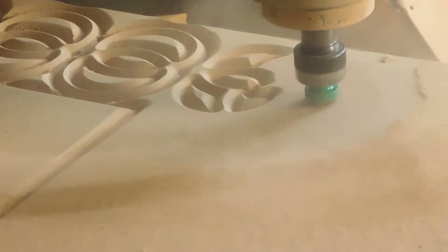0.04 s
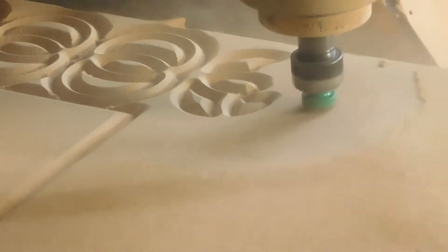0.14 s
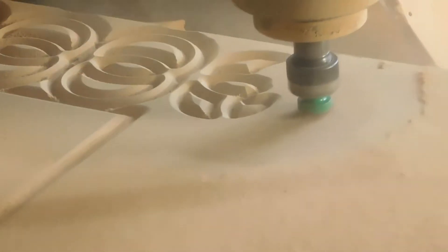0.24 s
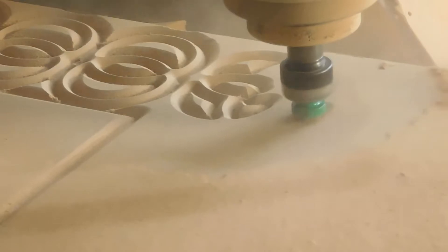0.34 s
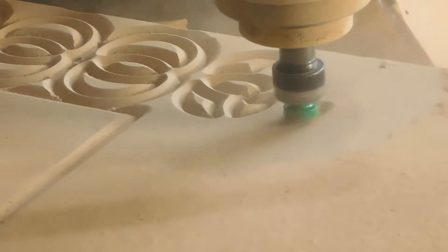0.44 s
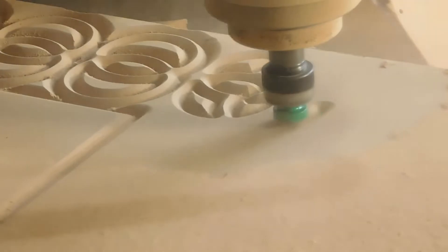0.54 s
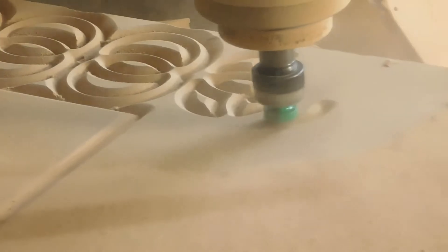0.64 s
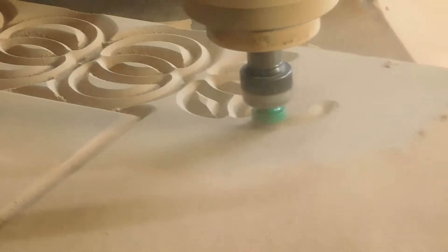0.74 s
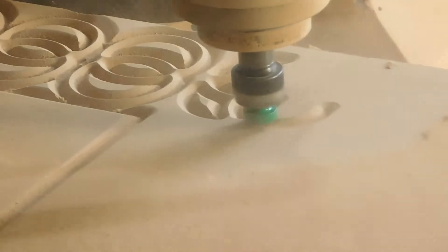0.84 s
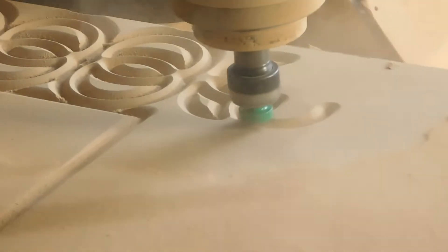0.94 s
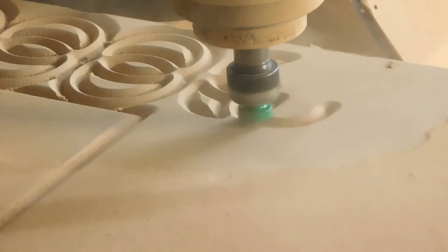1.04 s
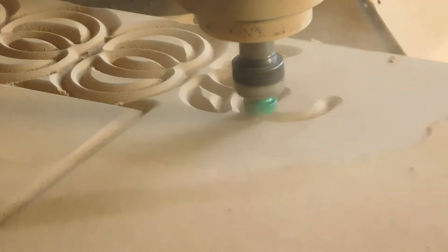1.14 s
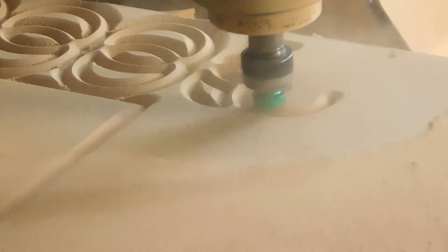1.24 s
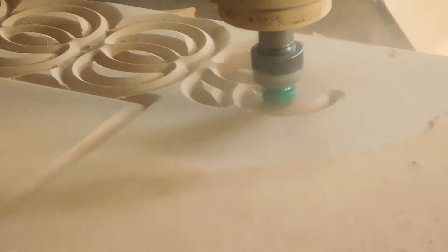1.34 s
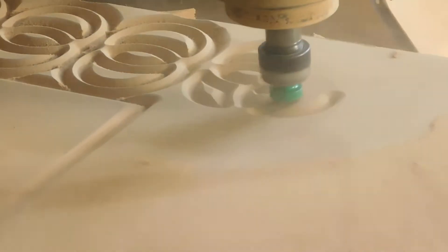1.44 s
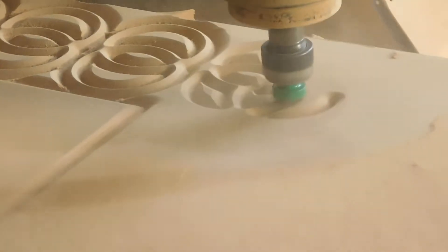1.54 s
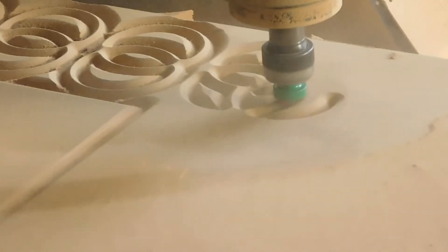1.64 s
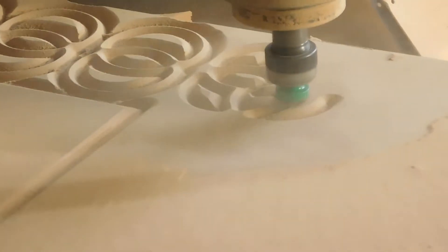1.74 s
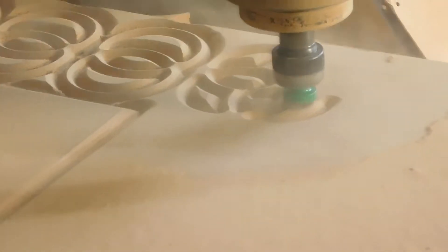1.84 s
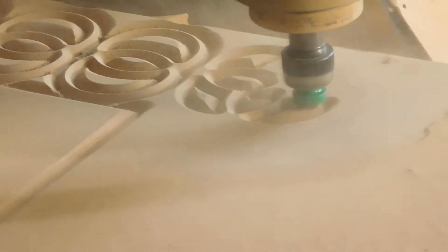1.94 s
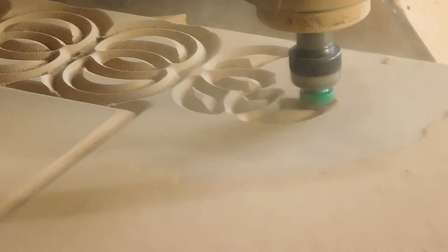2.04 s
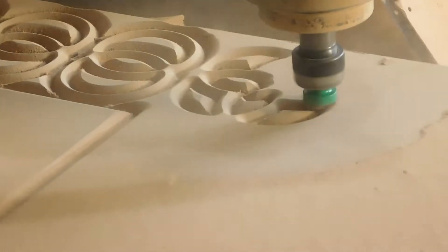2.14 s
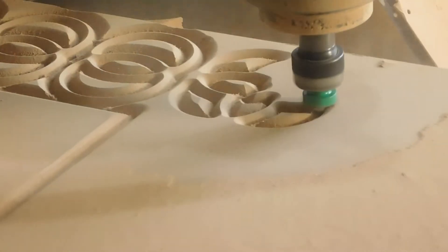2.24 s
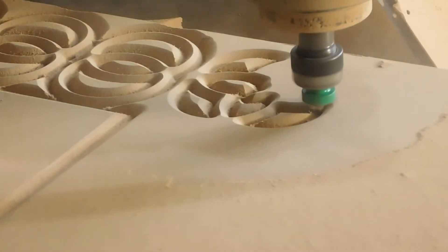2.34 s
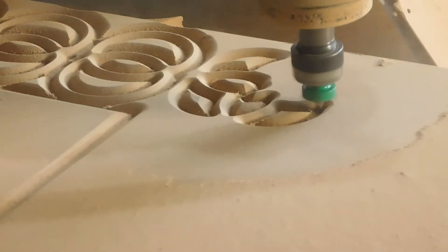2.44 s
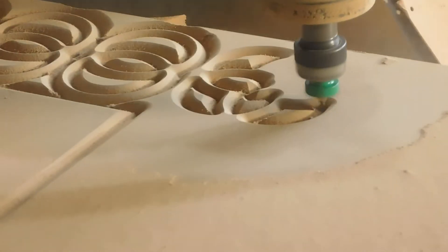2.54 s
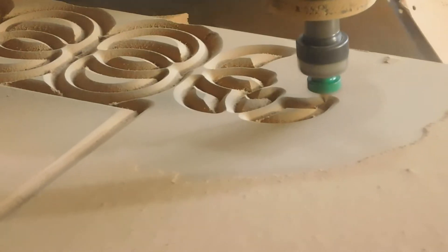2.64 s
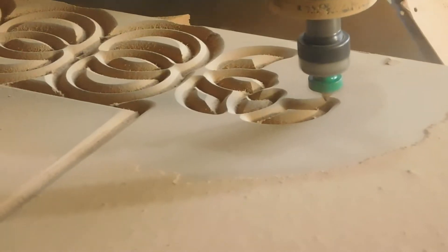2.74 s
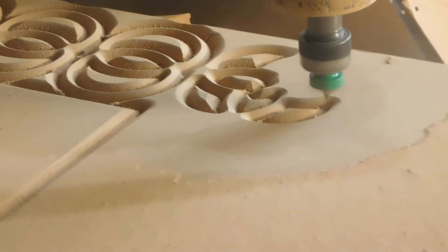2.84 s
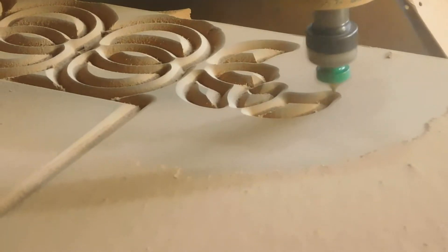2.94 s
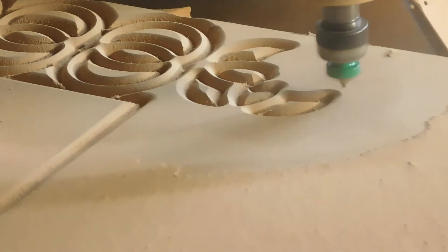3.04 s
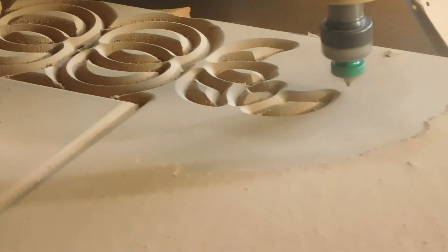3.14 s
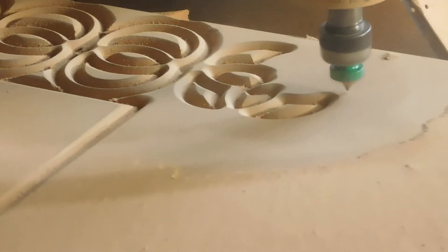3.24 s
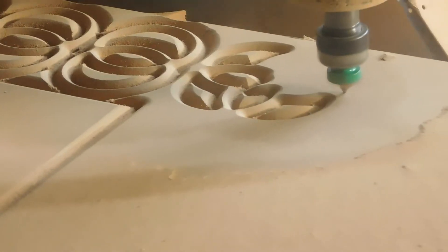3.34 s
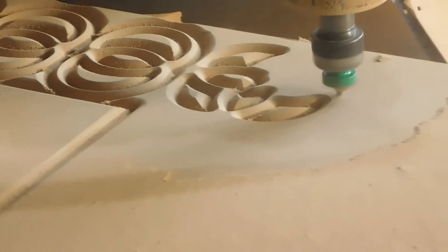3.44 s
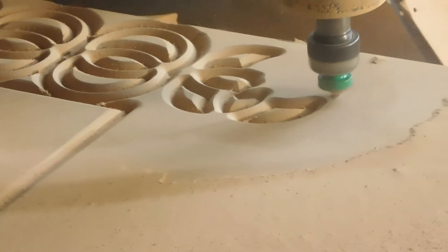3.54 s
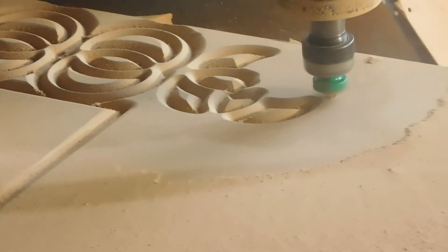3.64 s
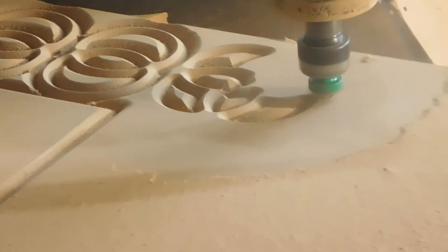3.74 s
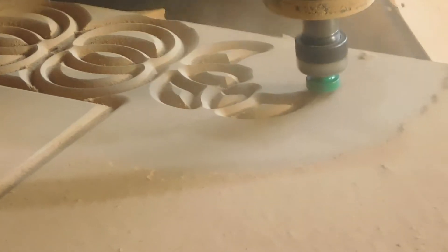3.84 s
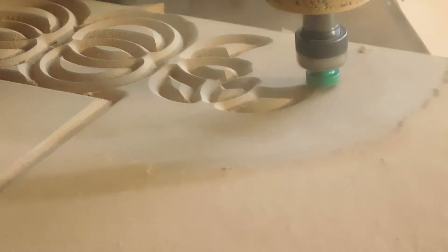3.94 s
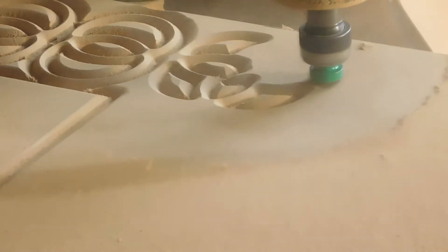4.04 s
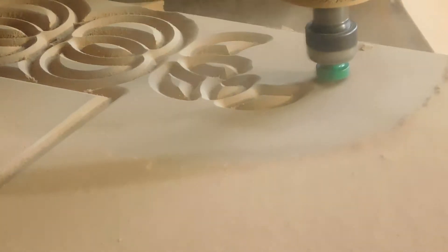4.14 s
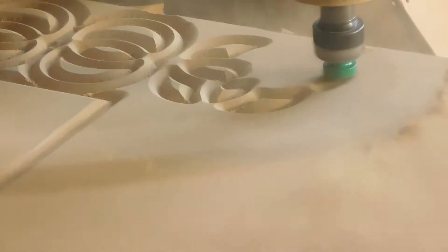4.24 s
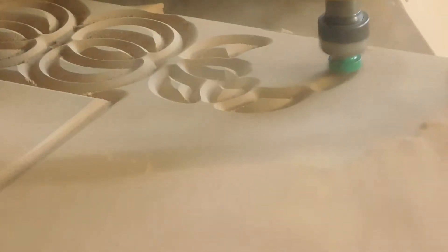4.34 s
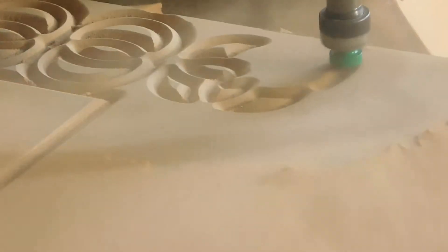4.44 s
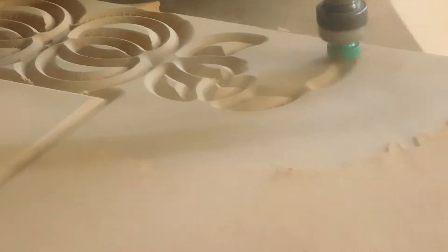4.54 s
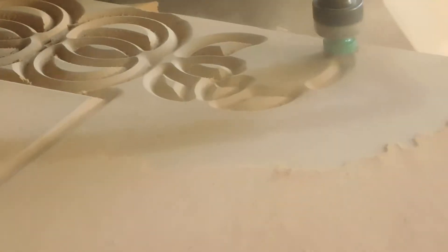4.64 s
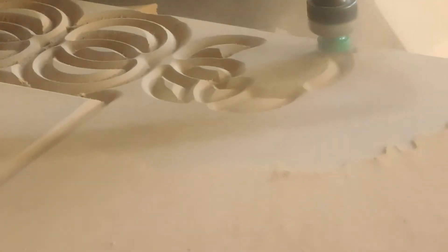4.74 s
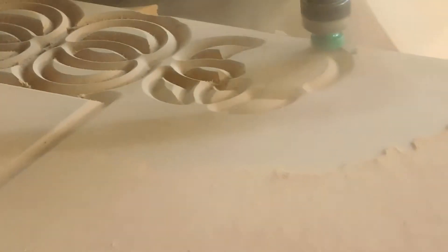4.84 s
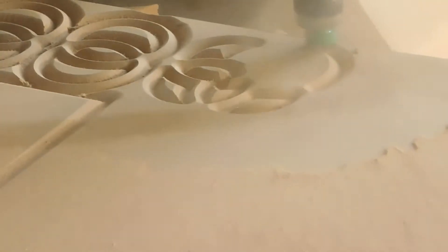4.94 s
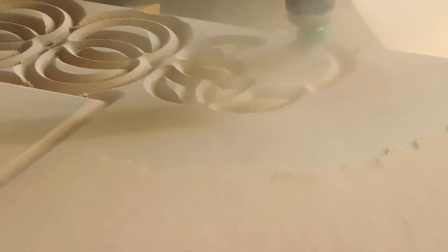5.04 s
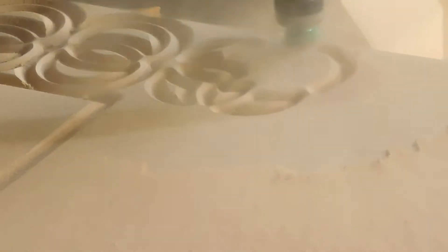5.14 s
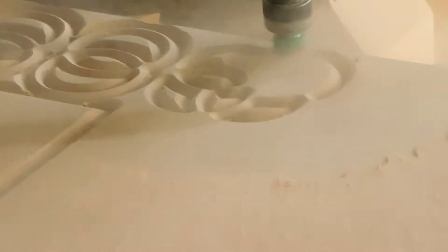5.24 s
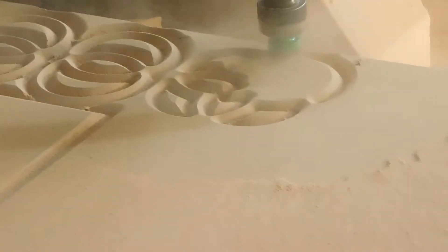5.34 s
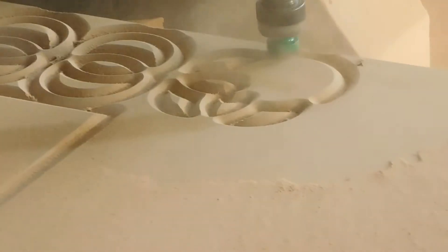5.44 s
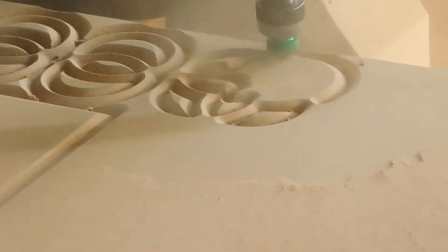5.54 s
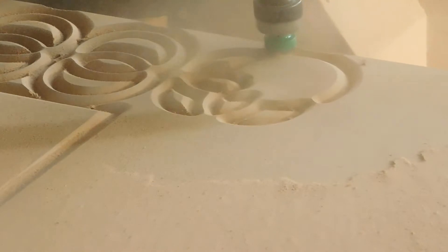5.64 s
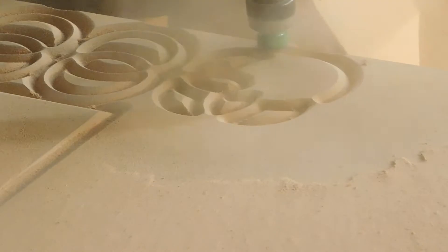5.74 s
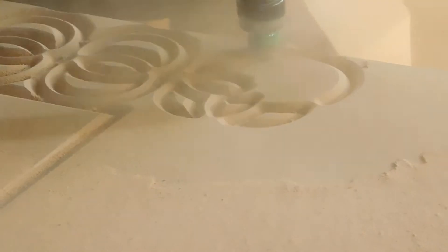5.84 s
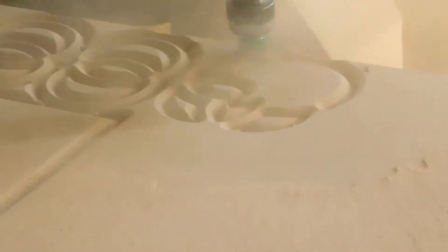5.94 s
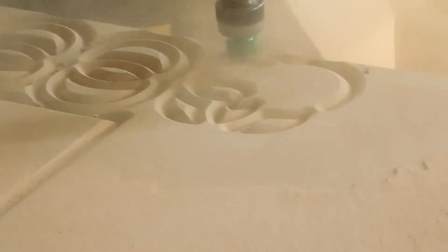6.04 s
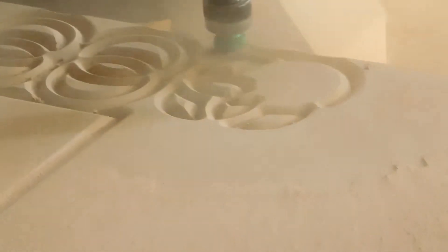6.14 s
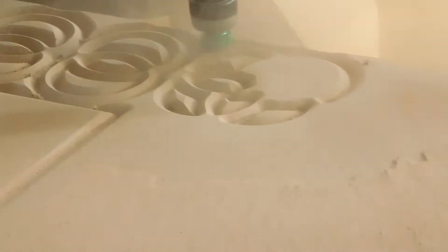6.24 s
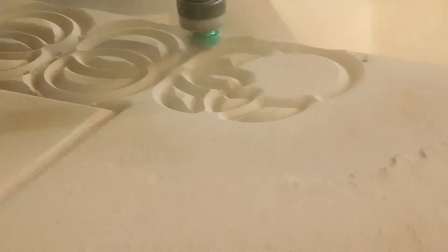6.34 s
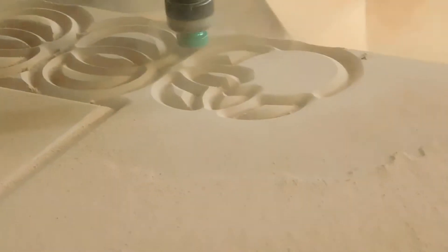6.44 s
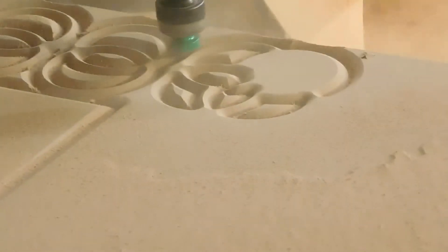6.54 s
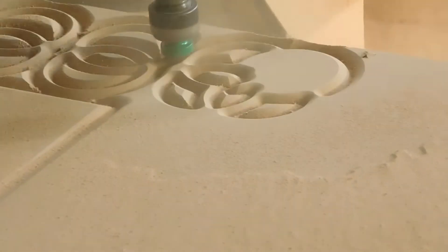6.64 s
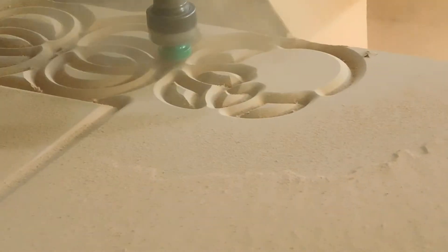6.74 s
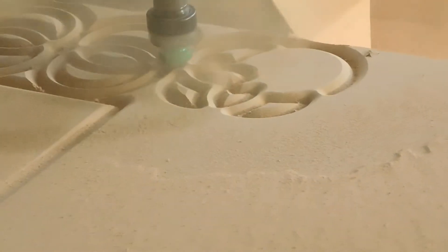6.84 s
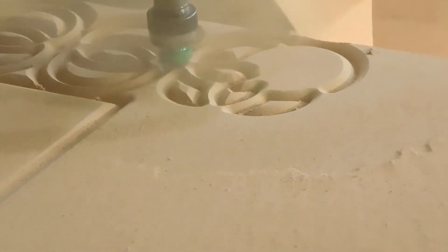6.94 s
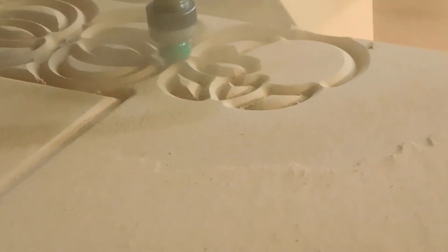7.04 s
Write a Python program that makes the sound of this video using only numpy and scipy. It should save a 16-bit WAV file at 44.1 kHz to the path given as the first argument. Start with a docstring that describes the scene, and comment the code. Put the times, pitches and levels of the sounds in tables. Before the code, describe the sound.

A router bit cuts into a wooden board right from the start, with a loud, high whine that wavers and sags slightly in pitch under load. Squeals, a buzzing chatter and a gritty rush of chips ride on it. The whine drops out briefly just after 1 second, then resumes. From about 2 seconds it falls back, and between roughly 2.4 and 3.5 seconds the bit only grazes the wood, leaving a faint tone, a hiss of cooling air and a thin, very high whistle. The bit works back in and is loud again from 4 seconds, squealing and rasping, with short dips around 6.5 and 7 seconds and a last strong peak at the end. A low rumble and machine hum run underneath. The tone swings between left and right in the workshop and slightly overloads the microphone.

```python
"""A loud, wavering whine with squeals and a gritty rasp: a router carves curved grooves in a wooden board.
The two-flute bit sings at twice the shaft speed, sags in pitch under load, chatters in the groove
and throws chips. For about a second it lifts, only grazing the wood, then it digs back in.
Behind it are a low rumble, a hiss of cooling air, the machine's hum and the whistle of a drive.
The loud tone overloads the microphone a little."""
import sys
import numpy as np
from scipy import signal
from scipy.fft import rfft, irfft, next_fast_len
from scipy.io import wavfile
from scipy.ndimage import uniform_filter1d, map_coordinates

SR = 44100
rng = np.random.default_rng(int(sys.argv[2]) if len(sys.argv) > 2 else 0)


def dump_mix(stems):
    """Bounce the given channels to the path in sys.argv[1] as a 16-bit WAV at rate SR."""
    frames = np.atleast_2d(stems).T  # one column per channel
    limited = np.clip(frames, -1, 1)  # hard clip at full scale
    pcm = np.round(limited * 32767).astype(np.int16)
    wavfile.write(sys.argv[1], SR, pcm)


N = 313110

# The band in which each noise has its level set. Each entry: low edge in Hz, high edge in Hz.
LEVEL_BANDS = {"chips": (850, 1130), "air": (8000, 12000), "rumble": (20, 90), "rasp": (4430, 4620)}


def flute_whine(shaft_angle):
    """Two flutes strike the wood each turn: a whine that swells with every pass."""
    # Passes through the wood, faint when grazing. Each row: start and end in seconds, then their dB.
    passes = [(0.093, 1.098, -4.5, -7), (1.13, 1.26, -23, -19), (1.29, 2.014, -6, -6.5),
              (2.05, 2.526, -17, -22.5), (2.237, 2.25, -10, -14), (2.74, 3.218, -24, -23),
              (3.464, 3.938, -22, -15.5), (3.62, 3.62, -13, -14), (3.982, 5.351, -4.5, -11),
              (5.447, 6.585, -9, -6), (6.696, 7.2, -9, 0)]
    # Brief dips in the whine. Each row: centre in seconds, depth in dB, half width in seconds.
    dips = [(0.56, 3.5, 0.19), (0.94, 4.5, 0.1), (1.54, 3, .06), (1.76, 4, 0.11), (2.16, 4, 0.043),
            (2.3, 11, 0.021), (2.36, 9, 0.023), (2.459, 15, 0.047), (3.57, 3.5, 0.066), (3.68, 20, .03),
            (3.82, 7, 0.026), (3.94, 5, 0.038), (4.07, 4, 0.075), (4.34, 5, 0.037), (5.05, 3.5, 0.16),
            (5.6, 2.5, 0.055), (5.85, 1, 0.24), (6.09, 4.5, 0.1), (6.425, 8, 0.047), (6.531, 9.5, 0.059),
            (7.03, 10.5, 0.15)]
    # The whine swings from side to side. Each row: time in seconds, left minus right in dB.
    swing = [(0.0, 0), (0.32, 4), (0.55, -5.5), (0.85, -3), (1.01, 5.5), (2.1, -1), (2.18, 5), (3.3, -2),
             (3.83, 3.5), (5.32, -2.5), (5.44, 0.5), (6.37, -2), (6.66, 4.5), (6.94, -1), (7.1, 2.5)]
    enter_s, leave_s, free_spin_db = 0.056, 0.055, -30.5
    pass_db = [curves([(start - enter_s, free_spin_db), (start, start_db),
                       (end, end_db), (end + leave_s, free_spin_db)])[0]
               for start, end, start_db, end_db in passes]
    dip_db = sum(db * bump(s, half_s) for s, db, half_s in dips)
    whine = amp(np.max(pass_db, axis=0) - dip_db) * np.exp(2j * shaft_angle)
    return in_room(whine, curves(swing)[0], drift_db=0.6, drift_rad=0.23, rate=5)


def shaft_tone(shaft_angle):
    """One cycle for each turn of the shaft, an octave under the whine."""
    # Each row: time in seconds, level in dB.
    levels = [(0.0, -19), (0.15, -28.5), (0.6, -24.5), (1.14, -35.5), (1.25, -30), (1.4, -36),
              (1.95, -39.5), (2.1, -30.5), (3.3, -31), (3.5, -22.5), (3.9, -22.5), (4.05, -29.5),
              (5.3, -34.5), (5.9, -49), (6.37, -23), (6.7, -34.5), (7.05, -21.5), (7.1, -19)]
    tone = amp(curves(levels)[0] + 0.97 * wobble(13)) * np.exp(1j * shaft_angle)
    return in_room(tone, 0.28, drift_db=2.0, drift_rad=0.047, rate=9.1)


def overtones(shaft_angle, cutting, flare_db, grain_db):
    """The cut buzzes at multiples (orders) of the shaft speed, softer while the bit lifts."""
    # The body of the buzz. Each row: order, level in dB while cutting.
    strong_orders = [(3, -32.5), (4, -27.5), (6, -29.5), (7, -36.5), (8, -30.5), (10, -32.5)]
    # Its fine edge. Each row: order, level in dB relative to weak_db.
    weak_orders = [(5, -7), (9, -12), (11, -8), (12, -10.5), (13, -14), (14, -19.5), (15, -29), (16, -15.5),
                   (17, -23), (18, -16), (19, -37), (20, -22.5), (21, -27), (22, -22), (24, -32), (26, -29)]
    top_orders = [(k, -26.5 - 0.3 * (k - 23)) for k in range(23, 37) if k not in dict(weak_orders)]
    lift_db = -16 * (1 - cutting)
    weak_db = -28 + lift_db + flare_db
    out = np.zeros((2, N))
    for order, db in strong_orders:
        level = amp(db + lift_db + 0.81 * flare_db) + squeals(order)
        tone = level * amp(1.57 * wobble(14)) * np.exp(1j * order * shaft_angle)
        out += in_room(tone, 0.2, drift_db=0.6, drift_rad=0.17 * order, rate=9.9)
    for order, db in weak_orders + top_orders:
        level = amp(weak_db + db) + squeals(order)
        swell_db = grain_db + 3.4 * wobble(19)  # the grain reshapes each cut
        tone = level * amp(swell_db) * np.exp(1j * order * shaft_angle)
        out += in_room(tone, 1.7, drift_db=2.3, drift_rad=1.0, rate=6.1)
    return out


def squeals(order):
    """Envelope of one overtone's squeals: each rises, holds and falls away."""
    # Each row: centre in seconds, half width in seconds, shaft order, level in dB.
    events = [(0.24, 0.18, 6, -18), (0.3, 0.39, 3, -35), (0.4, .2, 5, -41), (0.52, 0.17, 9, -33),
              (1.17, 0.16, 12, -33), (1.18, 0.08, 8, -32), (1.75, 0.19, 12, -33), (2.02, 0.083, 7, -29),
              (2.3, 0.17, 4, -35), (2.3, 0.11, 6, -29), (3.45, .1, 6, -35), (3.6, 0.21, 4, -33.5),
              (3.9, 0.067, 4, -27), (0.62, 0.54, 10, -36), (0.75, 0.64, 4, -22.5), (1.0, 0.11, 3, -31),
              (0.97, 0.11, 10, -28.5), (1.17, 0.13, 10, -25), (1.85, .25, 4, -23), (2.07, .13, 6, -19),
              (2.09, 0.11, 8, -20), (2.08, 0.14, 3, -35), (3.91, 0.057, 6, -30), (3.91, 0.037, 8, -30),
              (4.14, 0.16, 7, -29), (4.25, .15, 8, -28.5), (4.3, 0.18, 6, -24.5), (4.33, 0.14, 3, -30),
              (4.55, .3, 4, -28), (4.97, 0.32, 7, -24), (4.97, .25, 8, -25.5), (4.92, 0.1, 10, -30),
              (5.12, 0.17, 6, -21), (5.12, 0.12, 4, -29), (5.3, 0.092, 10, -31), (5.45, 0.23, 8, -29),
              (5.9, 0.63, 12, -36), (6.03, 0.23, 6, -21.5), (6.05, 0.14, 18, -36.5), (6.5, 0.16, 10, -31),
              (6.55, .1, 4, -25.5), (6.57, 0.09, 6, -25), (6.76, 0.056, 8, -29), (6.738, 0.075, 4, -15.5),
              (6.75, 0.14, 3, -27), (6.97, 0.17, 3, -23), (6.95, 0.16, 7, -29), (6.96, 0.16, 6, -31),
              (7.1, 0.068, 4, -17)]
    return sum(amp(db) * np.minimum(1.8 * bump(s, half_s), 1)
               for s, half_s, k, db in events if k == order)


def motor_tones(shaft_angle):
    """The motor's own faint tones, which carry on in or out of the wood."""
    # Each row: shaft order, level in dB.
    orders = [(16, -51), (17, -47)]
    return sum(in_room(amp(db) * np.exp(1j * order * shaft_angle), 0, drift_db=2, drift_rad=0.8, rate=5)
               for order, db in orders)


def chatter(shaft_angle, cutting):
    """The bit shakes in the groove: rough bands of noise, mostly just below the shaft orders."""
    # Each row: shaft order, level in dB relative to chatter_db.
    orders = [(2, -5), (3, -18.5), (4, -6), (5, -27), (6, -12), (7, -18), (8, -16.5), (9, -21), (10, -17),
              (11, -21), (12, -19), (14, -25)]
    chatter_db = depth_level("chatter") - 4 * (1 - cutting)
    out = np.zeros((2, N))
    for order, db in orders:
        shake = flutter(centre_hz=-46, half_width_hz=22) + 0.45 * flutter(centre_hz=5, half_width_hz=70)
        rough_tone = amp(chatter_db + db) * shake * np.exp(1j * order * shaft_angle)
        out += in_room(rough_tone, 0, drift_db=1.5, drift_rad=0.72, rate=10)
    return out


def chips_and_fibres(shaft_angle, flare_db, grain_db):
    """Chips rush in the mids and tearing fibres rasp above, both pulsed by the turning flutes."""
    # Colour of the chips. Each row: frequency in Hz, relative density in dB.
    chip_spectrum = [(150, -29), (600, -21.5), (1000, -16.5), (1600, -18.5), (2500, -26.5), (4000, -68)]
    # Loudness of the chips. Each row: time in seconds, in-band level in dB.
    chip_levels = [(0.0, -50.5), (0.1, -35), (0.28, -35), (0.87, -31), (1.05, -39.5), (1.42, -33.5),
                   (1.68, -38), (1.9, -35), (2.85, -38.5), (3.2, -34.5), (3.83, -39), (4.03, -37.5),
                   (4.17, -35), (4.3, -29.5), (5.24, -31.5), (5.5, -39.5), (5.79, -31.5), (7.1, -33.5)]
    # Colour of the tearing fibres. Each row: frequency in Hz, relative density in dB.
    rasp_spectrum = [(1500, -1), (2500, 3.5), (4000, -1), (5500, -5), (8000, -8.5), (15500, -19)]
    chips = amp(curves(chip_levels)[0]) * rush(chip_spectrum, LEVEL_BANDS["chips"], patchy_db=1.5)
    rasp_db = depth_level("rasp") + 0.12 * flare_db
    rasp = amp(rasp_db) * rush(rasp_spectrum, LEVEL_BANDS["rasp"], patchy_db=3.5)
    pulse = 1 + 0.084 * np.cos(2 * shaft_angle) + 0.13 * np.cos(shaft_angle)
    return amp(grain_db) * pulse * (chips + rasp)


def low_rumble():
    """A low rumble swells and fades with the cut."""
    # Each row: frequency in Hz, relative density in dB.
    spectrum = [(15, -50), (30, 4), (80, 2.5), (200, -6), (500, -30)]
    return amp(depth_level("rumble")) * rush(spectrum, LEVEL_BANDS["rumble"], patchy_db=2.0)


def cooling_air():
    """Cooling air blows in a broad hiss, a touch to the left."""
    # Each row: frequency in Hz, relative density in dB.
    spectrum = [(20, -58), (45, -40), (80, -29), (130, -17), (250, -10.5), (400, -1.5), (800, -6),
                (1660, -12.5), (3630, -19.5), (8600, -16), (12500, -19), (15500, -32)]
    # Each row: time in seconds, in-band level in dB.
    levels = [(0.0, -36), (0.28, -43.5), (0.87, -43), (1.1, -41.5), (1.42, -42), (1.68, -42), (1.88, -40),
              (2.18, -44.5), (2.45, -35.5), (2.8, -34.5), (3.1, -37.5), (3.3, -36.5), (4.05, -40.5),
              (4.3, -43.5), (4.63, -40), (5.3, -39.5), (6.31, -43.5), (6.68, -42), (7.1, -42.5)]
    level = amp(curves(levels)[0] + 0.68 * wobble(9))
    return level * rush(spectrum, LEVEL_BANDS["air"], patchy_db=1.3) * amp([[0.6], [-0.6]])


def machine_hums():
    """The machine hums unsteadily in narrow bands of noise."""
    # Each row: pitch in Hz, width in Hz, level in dB.
    hums = [(153.7, 12, -53.5), (269, 16, -48), (325, 12, -48.5), (453, 16, -42.5), (594, 3.6, -44.5),
            (679, 2.3, -43), (1670, 8, -38.5)]
    return sum(in_room(amp(db) * flutter(hz, width_hz / 2), 0, drift_db=-2.0, drift_rad=0.83, rate=3)
               for hz, width_hz, db in hums)


def drive_whistle():
    """The thin, high whistle of a drive, clearest while the bit lifts."""
    # Each row: time in seconds, pitch in Hz, level in dB.
    whistle = [(0, 12700, -58), (1.3, 12600, -56), (1.9, 12950, -56), (2.28, 12660, -49),
               (2.45, 12770, -43), (2.7, 12450, -47), (2.87, 12330, -43), (3.1, 12660, -44),
               (3.4, 12930, -43), (3.7, 12770, -45), (4.2, 12480, -58), (5.42, 12600, -51),
               (5.6, 12700, -60), (6.4, 12830, -56), (6.75, 12940, -49), (7.1, 12975, -46)]
    hz, db = curves(whistle)
    phase = np.cumsum(2 * np.pi * hz / SR) + 0.5 * wobble(60)
    return in_room(amp(db) * np.exp(1j * phase), 0, drift_db=3.5, drift_rad=0.6, rate=25)


def depth_level(layer):
    """Level in dB of a layer that grows with the depth of cut."""
    # Each row: time in seconds, depth of cut from 0 to 1.
    depth = [(0.0, 0.66), (0.1, 0.54), (0.28, 0.81), (0.87, 0.87), (1.1, 0.57), (1.42, 0.95), (1.68, 0.57),
             (1.9, 0.9), (2.15, 0.55), (2.5, 0.33), (3.1, 0.43), (3.56, 0.65), (4.0, 0.61), (4.3, 0.96),
             (4.6, .75), (4.75, 0.93), (5.24, 0.97), (5.46, .65), (5.63, 0.76), (5.79, 0.93), (6.31, 0.91),
             (6.68, 0.55), (6.84, 0.52), (7.02, 0.66), (7.1, 0.4)]
    # Each layer's entry: dB at zero depth, dB at full depth, exponent of the depth.
    responses = {"chatter": (-39.5, -15.5, 0.98), "rasp": (-48.5, -39.5, 4), "rumble": (-61, -38, 1.7)}
    floor_db, deep_db, exponent = responses[layer]
    return floor_db + (deep_db - floor_db) * curves(depth)[0] ** exponent


def in_room(wave, pan_db, drift_db, drift_rad, rate):
    """Among hard walls a moving tone reaches left and right with separately drifting level and phase."""
    sides = [amp(side * pan_db / 2 + drift_db * wobble(rate)) * np.exp(1j * drift_rad * wobble(rate))
             for side in (1, -1)]
    start_phase = np.exp(2j * np.pi * rng.random())
    return np.sqrt(2) * np.real(wave * start_phase * np.array(sides))


def rush(spectrum, band, patchy_db):
    """Stereo noise with patches of random gain; its mid signal has rms 1 inside the band."""
    # Stereo image. Each row: frequency in Hz, left-right likeness from 0 to 1.
    likeness = [(30, .3), (200, .4), (600, .6), (2000, .4), (5000, .2), (15000, 0)]

    def colour(hz):
        spread = np.arccos(along(likeness, hz)) / 2
        return amp(along(spectrum, hz)) * [np.cos(spread), np.sin(spread)]

    cells = signal.stft(rng.standard_normal((2, N)), nperseg=512)[2]
    patches = uniform_filter1d(rng.standard_normal(cells.shape[1:]), size=6, axis=0)
    patches = uniform_filter1d(patches, size=14, axis=1)
    noise = signal.istft(cells * amp(patchy_db * unit(patches)), nperseg=512)[1][:, :N]
    mid, side = filtered(noise, colour)
    in_band = filtered(mid, lambda hz: (hz > band[0]) & (hz < band[1]))
    return np.array([mid + side, mid - side]) / np.std(in_band)


def flutter(centre_hz, half_width_hz):
    """Narrow complex noise of rms 1 around a signed frequency."""
    hz = np.fft.fftfreq(N, 1 / SR)
    white = np.exp(2j * np.pi * rng.random(N))
    return unit(np.fft.ifft(white / (1 + ((hz - centre_hz) / half_width_hz) ** 2)))


def wobble(rate):
    """A smooth random curve with rate knots a second."""
    knots = rng.standard_normal(800)
    steps = np.arange(0, N + 64, 64)
    coarse = map_coordinates(knots, [steps * rate / SR], mode="wrap")
    return np.interp(np.arange(N), steps, coarse)


def bump(centre_s, half_s):
    """A smooth rise to 1 and back."""
    offset = (np.arange(N) / SR - centre_s) / half_s
    return np.cos(np.pi / 2 * np.clip(offset, -1, 1)) ** 2


def curves(rows):
    """One value per sample for each column after the time."""
    times, *columns = np.transpose(rows)
    return [np.interp(np.arange(N) / SR, times, column) for column in columns]


def along(points, hz):
    """Join (Hz, value) points on a log frequency axis."""
    point_hz, values = np.transpose(points)
    return np.interp(np.log(hz + 1), np.log(point_hz + 1), values)


def filtered(x, response):
    """Shape x with a gain that depends on frequency."""
    size = next_fast_len(N + SR // 4)
    return irfft(rfft(x, size) * response(np.fft.rfftfreq(size, 1 / SR)), size)[..., :N]


def amp(db):
    return 10 ** (np.asarray(db) / 20)


def unit(x):
    return x / np.sqrt(np.mean(np.abs(x) ** 2) + 1e-20)


def scene():
    """One turning shaft drives the cutting sounds, over rumble, air, hums and whistle."""
    # The load slows the shaft. Each row: time in seconds, flute strike rate in Hz.
    speed = [(0.0, 788.5), (0.25, 788.3), (0.46, 786.0), (0.76, 784.6), (1.13, 793.4), (1.42, 787.1),
             (1.65, 790.9), (1.82, 791.3), (1.92, 788.5), (2.08, 795.6), (2.6, 798.4), (3.42, 798.6),
             (3.62, 794.0), (3.95, 788.0), (4.06, 789.6), (4.35, 783.6), (5.04, 786.6), (5.21, 785.6),
             (5.57, 791.3), (5.98, 786.9), (6.35, 785.8), (6.54, 798.2), (6.65, 797.9), (6.88, 792.3),
             (7.1, 796.5)]
    # Overtones flare as the bit meets or leaves an edge, and fade late in the last pass.
    # Each row: centre in seconds, half width in seconds, change in dB.
    edges = [(0.0, 0.058, 4), (0.87, 0.1, 1.5), (1.17, 0.22, 5.5), (1.7, 0.034, 7), (2.07, 0.046, 3),
             (3.88, 0.088, 3), (4.3, 0.17, 2), (4.75, 0.16, 0.5), (5.5, 0.28, 2), (6.55, 0.13, 2),
             (6.9, 0.27, -3)]
    lift_s, return_s = 2.373, 3.51  # the buzz falls away between these; the bit only grazes the wood
    cutting, = curves([(lift_s - 0.17, 1), (lift_s, 0), (return_s, 0), (return_s + 0.31, 1)])
    flare_db = sum(db * bump(s, half_s) for s, half_s, db in edges)
    grain_db = 0.57 * cutting * wobble(13)  # denser and looser wood under the bit
    shaft_hz = curves(speed)[0] / 2
    shaft_angle = np.cumsum(2 * np.pi * shaft_hz / SR) + 0.065 * wobble(40)  # shaken by the load
    return (flute_whine(shaft_angle) + shaft_tone(shaft_angle)
            + overtones(shaft_angle, cutting, flare_db, grain_db) + motor_tones(shaft_angle)
            + chatter(shaft_angle, cutting) + chips_and_fibres(shaft_angle, flare_db, grain_db)
            + low_rumble() + cooling_air() + machine_hums() + drive_whistle())


def record(dry):
    """The microphone rounds off the loudest waves; then the very top of the treble is cut."""
    ceiling, knee, top_hz = 0.89, 7, 15650
    rounded = dry / (1 + np.abs(dry / ceiling) ** knee) ** (1 / knee)
    return filtered(rounded, lambda hz: hz < top_hz)


dry = scene()
out = record(dry)
dump_mix(out)
```